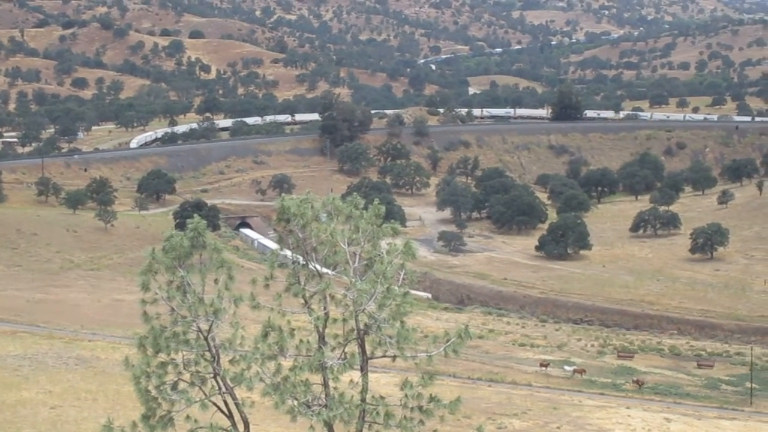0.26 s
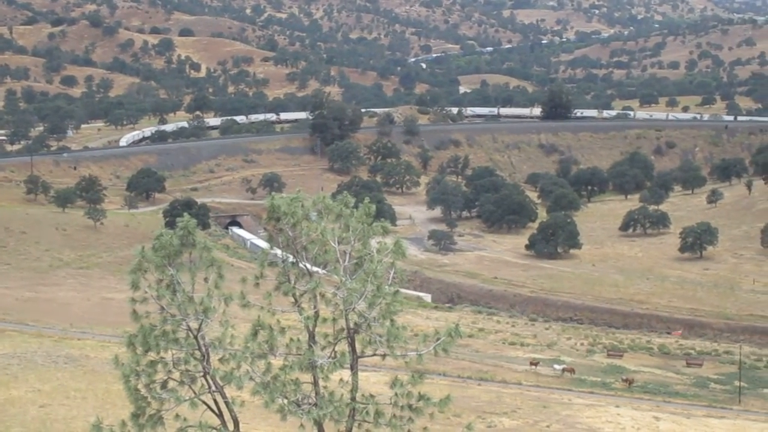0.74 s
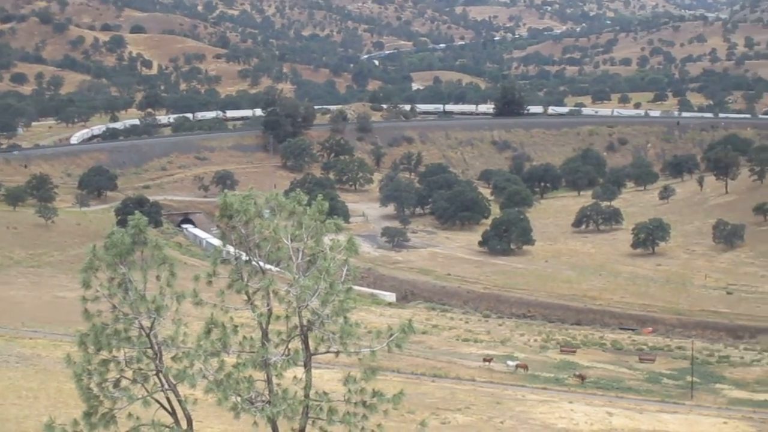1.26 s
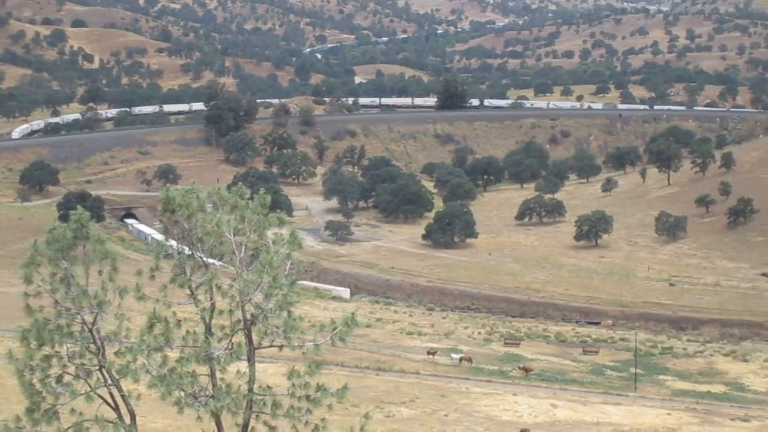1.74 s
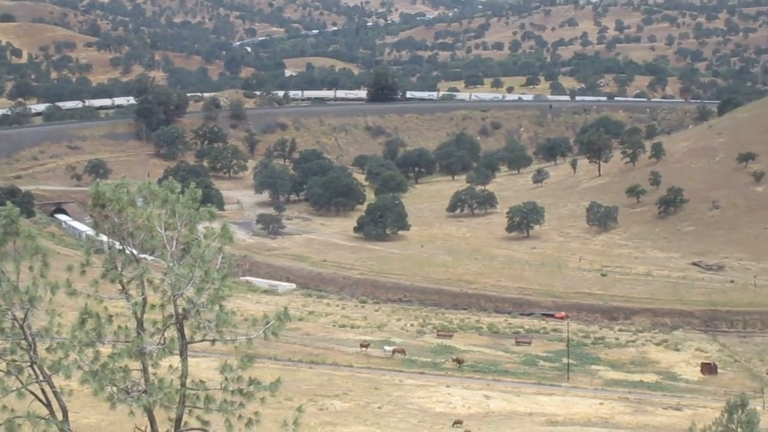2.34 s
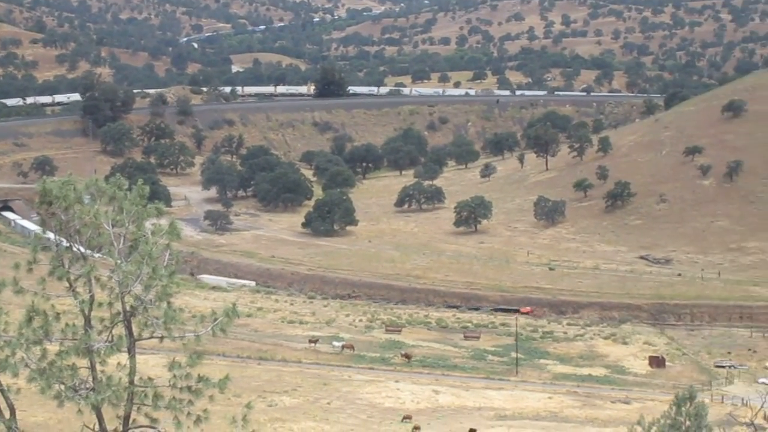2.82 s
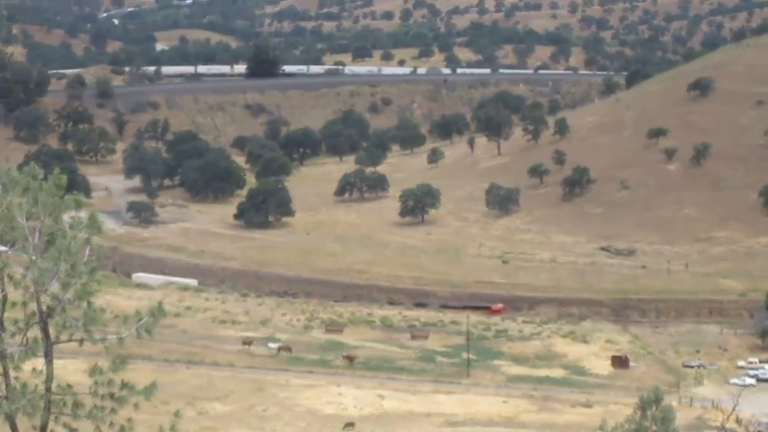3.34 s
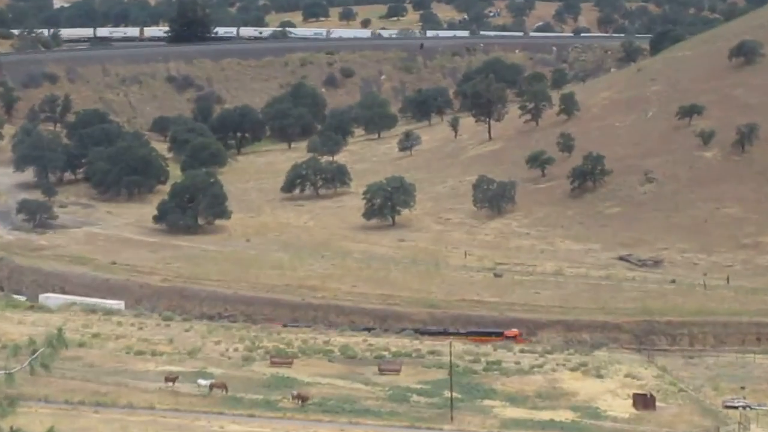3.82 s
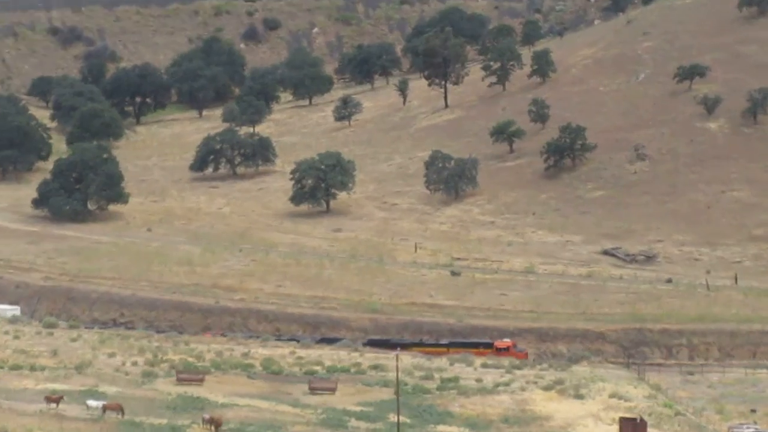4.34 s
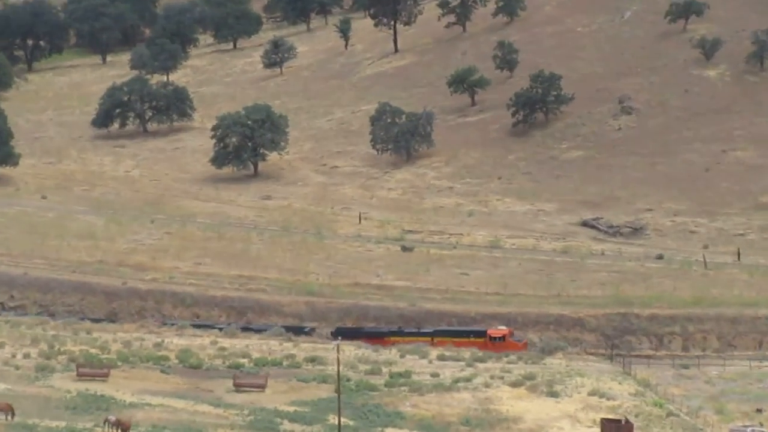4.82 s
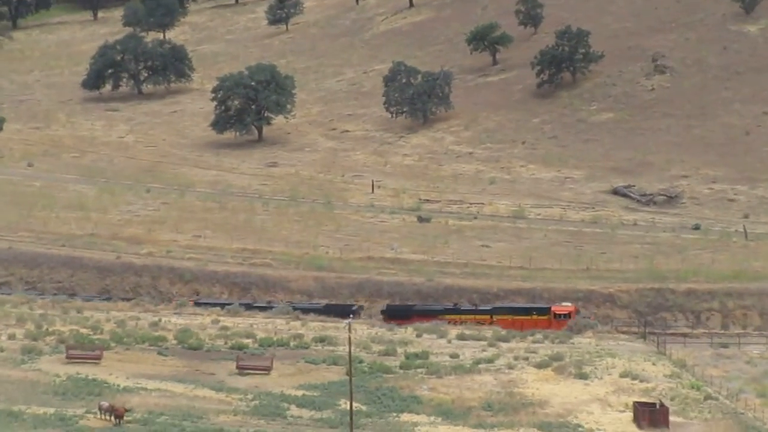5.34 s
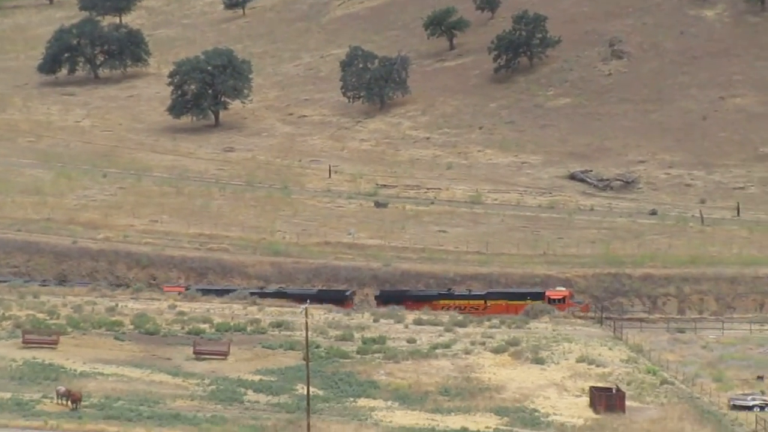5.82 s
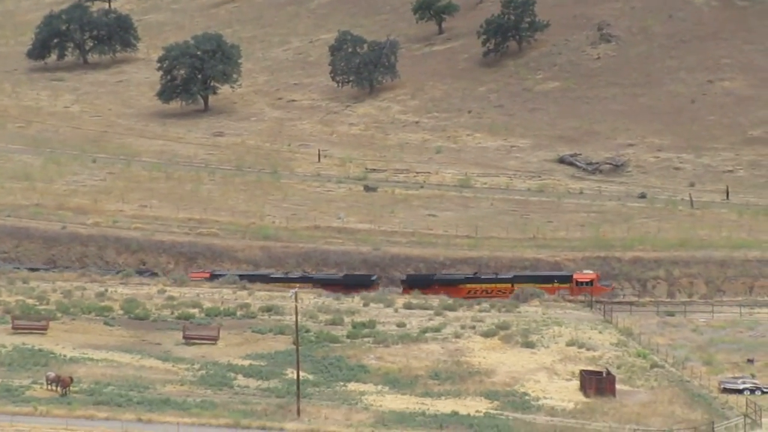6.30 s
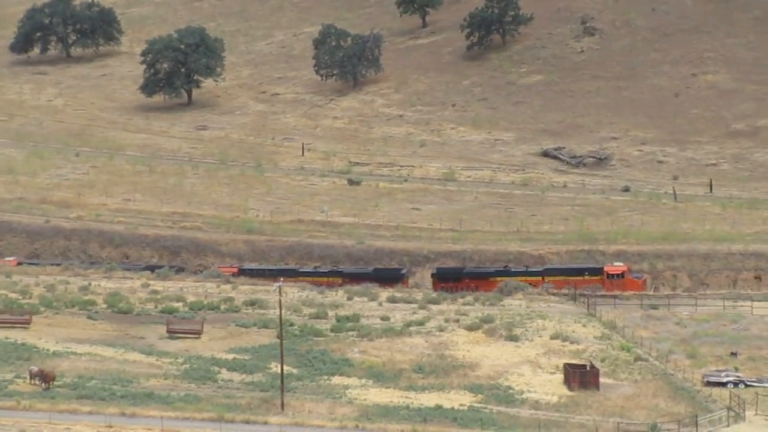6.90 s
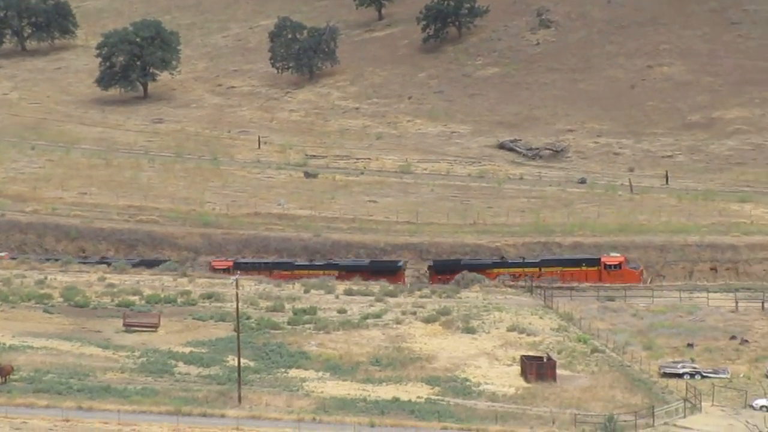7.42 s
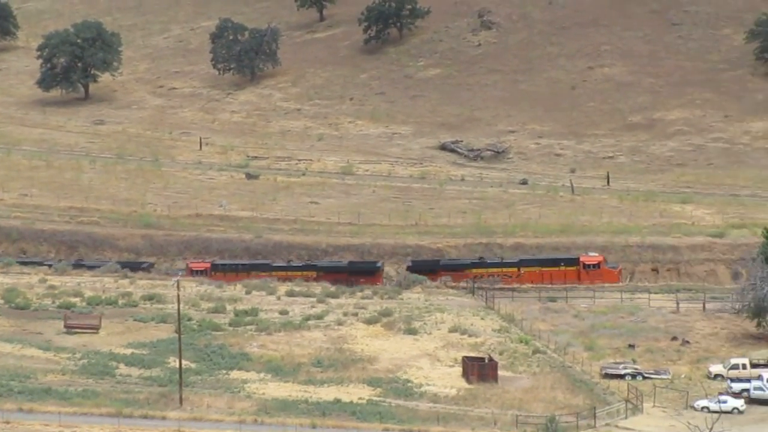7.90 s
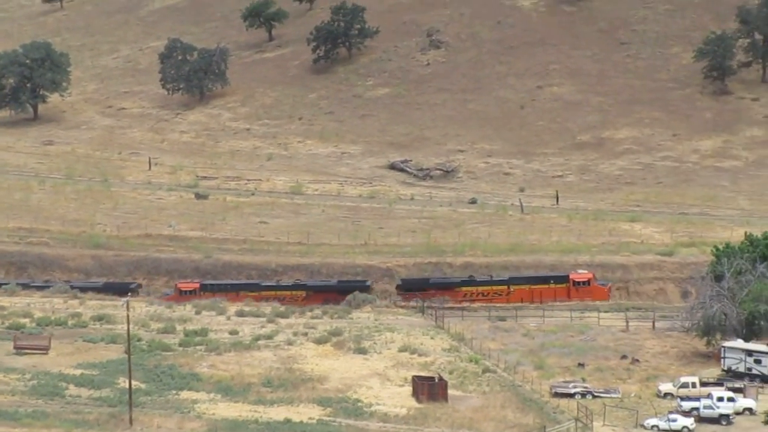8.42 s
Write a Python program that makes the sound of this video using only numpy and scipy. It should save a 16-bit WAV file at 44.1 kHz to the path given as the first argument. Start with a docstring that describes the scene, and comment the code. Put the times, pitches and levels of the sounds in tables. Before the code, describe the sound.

Mono outdoor sound from a breezy hillside above a dry valley. Throughout, distant diesel locomotives give a low, wavering drone with throbbing exhaust, layered fan and blower whines, and thin, broken turbo whistles near 4 kHz; rolling wheels and singing rails add a soft hiss. From 0 to 2 s, wind patters, rasps and thumps densely on the microphone over deep rumble. Around 2.5-3.5 s, a faint scraping rush of flanges swells; at 3 s a few tiny bright ticks sound and a faint zoom motor whirs until about 5.3 s. Deep gusts continue, with a hard, slightly overloaded thump at 5 s, another scrape near 5.4 s, and the sharpest buffet at 5.9 s, followed by brief ducking and slow recovery. From 6 to 7 s it is calmer; scattered thumps come around 7-7.6 s. The whines strengthen and the low wind surges again towards 8.7 s.

```python
"""Diesel-electric locomotives haul a long freight train up a grade, far across a dry valley.
Engine harmonics, blade-tone stacks and turbo whistles waver and fade as the moving air scatters them.
Filtered noise makes the exhaust, rolling wheels, singing rails and the scrape of flanges on the curve.
At the hillside microphone gusts rumble, rasp and thump as eddies cross its port, over a very faint high hiss.
A lens motor whirs, a few bright ticks ring, and the recorder ducks under the hardest peaks."""
import sys
import numpy as np
from scipy import signal
from scipy.fft import rfft, irfft, next_fast_len
from scipy.io import wavfile
from scipy.ndimage import uniform_filter1d

SR = 44100
rng = np.random.default_rng(int(sys.argv[2]) if len(sys.argv) > 2 else 0)


def inscribe(sig):
    """Save sig as 16-bit PCM at rate SR to the path in sys.argv[1].

    A 1-D sig is mono; a 2-D sig holds one channel per row.
    Samples are clipped to [-1, 1] before scaling.
    """
    pcm = np.round(np.clip(np.atleast_2d(sig).T, -1, 1) * 32767)
    wavfile.write(sys.argv[1], SR, pcm.astype(np.int16))


N = 381899

CRANK_HZ = 26.5  # mean spacing of the engine harmonics

# how well the moving air carries the train's roar, relative levels: time_s, exhaust_db, wheels_db
TRAIN_CARRY = [(0.0, -35, -42.5), (0.55, -35, -46.5), (0.8, -40, -47.5), (1.25, -37.5, -46),
               (1.85, -33.5, -41), (2.25, -35, -43), (2.5, -34.5, -37), (3.05, -35.5, -36.5),
               (3.4, -37, -41.5), (4.1, -32, -43.5), (4.4, -32.5, -45), (4.65, -32, -42), (4.9, -39.5, -45),
               (5.35, -31, -40), (5.75, -36, -43), (6.6, -34.5, -45), (7.6, -33, -43), (8.66, -29.5, -40)]
# locomotive whines and hiss, each fading by itself, relative levels:
# time_s, blower_low_partials_db, fan_high_partials_db, turbo_hiss_db
MACHINE_FADES = [(0.0, -38, -54, -56), (0.55, -38, -59, -46.5), (1.25, -40.5, -50, -51.5),
                 (1.85, -37, -46.5, -51), (2.5, -39, -49, -58), (3.45, -34, -51, -49.5),
                 (4.15, -32, -48, -54), (4.7, -39.5, -48.5, -56), (5.15, -34, -62, -70),
                 (5.6, -39, -49.5, -53), (6.2, -54, -49, -56), (7.0, -48, -47, -48),
                 (7.45, -38, -41, -47.5), (8.15, -40, -45.5, -45.5), (8.66, -29.5, -39, -45)]
# strength of the wind between its gusts, relative levels: time_s, microphone_rumble_db, deep_surge_db
WIND_STRENGTH = [(0.0, -28, -37), (0.7, -24.5, -35), (1.4, -23, -37), (1.6, -19.5, -33), (2.0, -24.5, -28),
                 (2.3, -25, -23.5), (2.5, -25, -33), (2.9, -25.5, -28), (3.28, -31.5, -27),
                 (3.45, -26, -34), (3.65, -27.5, -29), (4.0, -27.5, -27.5), (4.5, -27, -35),
                 (4.74, -30, -27), (5.1, -29, -29.5), (5.7, -27, -27), (6.05, -28, -31),
                 (6.7, -35.5, -32.5), (7.25, -30.5, -28), (7.9, -25.5, -34), (8.66, -25.5, -20.5)]
# gusts that thump on the microphone, relative levels: time_s, thump_db, nominal_eddy_hz, gust_rumble_db
GUST_THUMPS = [(0.038, -6, 330, -11.5), (0.059, -7, 361, -12), (0.278, -12, 704, -25),
               (0.291, -8, 377, -25.5), (0.305, -16, 400, -30), (0.312, -10.5, 326, -29),
               (0.396, -11.5, 377, -34.5), (0.406, -4, 420, -29), (0.42, -2.5, 335, -16),
               (0.488, -15, 440, -23), (0.498, -5.5, 353, -25), (0.63, -11.5, 130, -29),
               (0.641, -18, 550, -33.5), (0.651, -1.5, 328, -36), (0.672, -7, 354, -27),
               (0.698, -15, 240, -38), (0.858, -12.5, 280, -27), (0.877, -11.5, 330, -35),
               (0.898, -8, 395, -30), (0.912, -9.5, 307, -33), (0.999, -12.5, 378, -34),
               (1.217, -6.5, 310, -18), (1.422, -15, 380, -32), (1.502, -18, 368, -33),
               (1.509, -7.5, 253, -24), (1.556, -11, 300, -31), (1.595, -7, 130, -13.5),
               (1.708, -5.5, 114, -28), (1.792, -9, 400, -31), (1.823, -6, 170, -26), (1.847, -5, 347, -25),
               (1.853, -2.5, 278, -20.5), (1.917, -3, 246, -28), (1.956, -1, 400, -23),
               (1.967, -9.5, 430, -27), (2.134, -4.5, 400, -27), (2.143, -2, 205, -26.5),
               (2.325, -13, 312, -26), (2.592, -7, 262, -24.5), (2.681, -5.5, 158, -29),
               (2.899, -13.5, 400, -21), (2.96, -3, 140, -23.5), (2.973, -8.5, 480, -33),
               (2.983, -5, 170, -19), (2.994, -5, 210, -16), (3.029, -22, 290, -15),
               (3.062, -9.5, 556, -23), (3.079, -2, 213, -23), (3.166, -9.5, 450, -38),
               (3.178, -6, 174, -33), (3.401, -4.5, 232, -22.5), (3.427, -5.5, 323, -31),
               (3.495, -7.5, 89, -23), (3.844, -15.5, 250, -28), (3.96, -4.5, 89, -21),
               (3.996, -6, 160, -24), (4.188, -9.5, 150, -35), (4.22, -10.5, 220, -21),
               (4.335, -0.5, 255, -16.5), (4.58, -13, 312, -16), (4.746, 0.5, 166, -30),
               (4.954, -5, 216, -27), (4.971, -5, 262, -24), (4.98, -4, 560, -25), (4.984, 4, 222, -20.5),
               (4.984, -4.5, 860, -34.5), (4.994, -3.5, 349, -26.5), (5.043, -13, 200, -39.5),
               (5.097, -12, 420, -38), (5.15, -12, 560, -41.5), (5.192, -8.5, 154, -22),
               (5.216, -10, 360, -35), (5.237, -11.5, 400, -29), (5.249, -6.5, 340, -27),
               (5.343, -11.5, 300, -27), (5.439, 0.5, 199, -17.5), (5.472, -11, 260, -28),
               (5.541, -3.5, 278, -32), (5.55, -5.5, 253, -23), (5.562, -1, 234, -35),
               (5.612, -14, 520, -36), (5.632, -11, 250, -29.5), (5.755, -13, 330, -38),
               (5.771, -8, 199, -30), (5.825, -8, 200, -26), (5.844, -2, 200, -42), (5.877, 3.5, 460, -22),
               (5.88, 8, 640, -24), (5.881, -8, 1350, -38), (5.892, 2.5, 545, -27),
               (6.199, -18, 377, -20.5), (7.072, -2.5, 445, -24), (7.242, -8, 283, -25),
               (7.317, -1.5, 226, -32), (7.37, -9, 380, -34), (7.389, -4, 550, -18.5),
               (7.637, -8, 99, -20.5), (8.411, -7, 120, -18), (8.626, -19, 118, -29)]


def undb(db):
    """Decibels to gain."""
    return 10 ** (np.asarray(db) / 20)


def unit(x):
    """Scale to rms 1."""
    return x / np.sqrt(np.mean(x ** 2))


def curves(table):
    """The columns of a table after its times, joined by straight lines, at every sample."""
    s, *columns = np.transpose(table)
    return [np.interp(np.arange(N) / SR, s, column) for column in columns]


def walk(rate):
    """Random levels held 1 / rate s and slewed twice; spread near 1."""
    hold = max(int(SR / rate), 2)
    steps = rng.standard_normal(2048).take(np.arange(N) // hold, mode="wrap")
    slewed = uniform_filter1d(steps, hold)
    return 1.32 * uniform_filter1d(slewed, hold)


def turning(db_per_s):
    """A steady change of level in dB, zero at mid-scene."""
    return db_per_s * (np.arange(N) - N / 2) / SR


def noise(spectrum):
    """Noise of rms 1 with a spectrum of (Hz, dB) points, falling 20 dB per octave beyond its ends."""
    size = next_fast_len(N)
    hz, db = np.transpose(spectrum)
    octave = np.log2(np.maximum(np.arange(size // 2 + 1) * SR / size, 1))
    beyond = np.abs(octave - np.clip(octave, np.log2(hz[0]), np.log2(hz[-1])))
    gain = undb(np.interp(octave, np.log2(hz), db) - 20 * beyond)
    return unit(irfft(rfft(rng.standard_normal(size)) * gain, size)[:N])


def add(out, s, sound):
    """Mix a short sound in, centred on time s."""
    start = int(s * SR) - len(sound) // 2
    lo, hi = max(start, 0), min(start + len(sound), N)
    if hi > lo:
        out[lo:hi] += sound[lo - start:hi - start]


def swell(s, attack, release, shape):
    """A gain that grows to 1 at time s and dies away again, on a 1 ms grid; shape 1 is pointed, 2 is round."""
    t = np.arange(0, N, SR // 1000) / SR - s
    return np.exp(-np.maximum(-t / attack, t / release) ** shape)


def swells(events, attack, release, shape):
    """Joint gain of swells given as (s, dB), their powers added, at every sample."""
    power = sum((undb(db) * swell(s, attack, release, shape)) ** 2 for s, db in events)
    return np.interp(np.arange(N), np.arange(0, N, SR // 1000), np.sqrt(power))


def rotation(hz, wander):
    """Phase of a governed shaft whose speed wanders slightly about its setting."""
    drift = walk(2)
    return 2 * np.pi * np.cumsum(hz * (1 + wander * (drift - drift.mean()))) / SR


def far_tone(phase, scatter, rate):
    """A tone of rms near 1 over a long path: the direct wave plus waves scattered by moving air."""
    phase = phase + 2 * np.pi * rng.random()
    in_step = (1 + scatter * walk(rate)) * np.sin(phase)
    out_of_step = scatter * walk(rate) * np.cos(phase)
    return (in_step + out_of_step) / np.sqrt(.5 + scatter ** 2)


def engines(fade_db=3.5):
    """The diesels under full load: harmonics locked to one wandering shaft, each scattered on its way over."""
    # the two loudest harmonics, fading apart on the way over the ground: time_s, harmonic_3_db, harmonic_5_db
    drone = [(0.0, -19.5, -29), (0.4, -23.5, -29.5), (0.85, -25.5, -33.5), (1.498, -22, -24),
             (2.3, -26.5, -36), (2.9, -33, -25), (3.4, -26.5, -29.5), (4.15, -37, -21), (4.9, -30, -36),
             (5.7, -23, -33.5), (6.7, -30, -25), (7.2, -35, -26), (8.0, -34, -41), (8.66, -27.5, -20.5)]
    # even harmonics that follow the exhaust: multiple, level_db relative to the exhaust curve
    even_harmonics = [(2, 4.5), (4, 2.5)]
    # weaker harmonics at steady mean level: multiple, level_db
    overtones = [(6, -39), (7, -37), (8, -49.5), (9, -64), (10, -44), (14, -61.5)]
    phase = rotation(CRANK_HZ, wander=0.0029)
    exhaust, _ = curves(TRAIN_CARRY)
    levels = list(zip((3, 5), curves(drone)))
    levels += [(round(k), exhaust + db + fade_db * walk(2.8)) for k, db in even_harmonics]
    strong = sum(undb(db) * far_tone(k * phase, scatter=0.14, rate=7.5) for k, db in levels)
    weak = sum(undb(db) * far_tone(round(k) * phase, scatter=0.53, rate=4) for k, db in overtones)
    return strong + weak


def exhaust_and_turbo_hiss(exhaust_db=5.5, turbo_db=-3, throb=0.13, flutter_db=1.3, turbo_flutter_db=4.1):
    """Exhaust gas and the turbochargers' narrow hiss: shaped noise, pulsing together at the engine rate."""
    # spectrum of the exhaust: frequency_hz, density_db
    gas_spectrum = [(30, -4.5), (60, 8.5), (130, 0.5), (250, 5.5), (450, -4.5), (580, -4.5), (700, -1.5),
                    (900, 0), (1150, -12), (1300, -10.5), (1480, -10.5), (1800, -20.5), (3000, -24.5)]
    # spectrum of the turbocharger hiss: frequency_hz, density_db
    hiss_spectrum = [(3300, -20), (3650, -4), (3860, 5), (3970, -2.5), (4090, 1), (4250, -14.5),
                     (5000, -41.5)]
    exhaust, _ = curves(TRAIN_CARRY)
    *_, turbo = curves(MACHINE_FADES)
    beat = 1 + throb * np.sin(rotation(CRANK_HZ, wander=0.0017))
    gas = noise(gas_spectrum) * undb(exhaust + exhaust_db + flutter_db * walk(4.5))
    intake = noise(hiss_spectrum) * undb(turbo + turbo_db + turbo_flutter_db * walk(7.5))
    return beat * (gas + intake)


def blade_tones(hz, partials, low_db, high_db, scatter):
    """Multiples of one blade rate, shimmering with distance; those below and above 1 kHz fade apart."""
    phase = rotation(hz, wander=0.001)
    out = np.zeros(N)
    for k, db in partials:
        path_db = low_db if k * np.mean(hz) < 1000 else high_db
        out += undb(path_db + db) * far_tone(round(k) * phase, scatter, rate=14)
    return out


def fans(scatter=0.38, low_db=-6, turn_db_s=0.38, rear_hz=210.3):
    """Cooling fans of two units: stacks of blade tones at nearly one rate, beating against each other."""
    # blade rate of the leading unit's fans: time_s, rate_hz
    lead_speed = [(0, 210.5), (5, 210.2), (7, 209.3)]
    # partials of the leading unit's fans, relative levels: multiple, level_db
    lead_partials = [(2, -7), (4, -5), (6, -1), (8, -3), (10, -9), (12, -13)]
    # partials of the rear unit's fans, relative levels: multiple, level_db
    rear_partials = [(3, -4.5), (4, -4.5), (5, -6.5), (6, -9.5), (7, -4.5), (8, -17.5), (9, -15.5),
                     (10, -15.5)]
    exhaust, _ = curves(TRAIN_CARRY)
    _, high, _ = curves(MACHINE_FADES)
    lead_hz, = curves(lead_speed)
    # the fans turn towards the microphone as the locomotives draw abreast
    low = exhaust + low_db + turning(turn_db_s)
    lead = blade_tones(lead_hz, lead_partials, low, high, scatter)
    return lead + blade_tones(rear_hz, rear_partials, low, high, scatter)


def blowers(scatter=0.48, high_db=-5, high_turn_db_s=-1.5):
    """Blowers whine as a stack of blade tones on a higher rate than the fans."""
    # blade rate: time_s, rate_hz
    speed = [(0, 375.3), (5, 375.2), (7.5, 373.6)]
    # partials, relative levels: multiple, level_db
    partials = [(2, -4.5), (3, -6.5), (4, -5.5), (5, -17), (6, -13.5), (8, -19)]
    _, wheels = curves(TRAIN_CARRY)
    low, _, _ = curves(MACHINE_FADES)
    hz, = curves(speed)
    # the high partials turn away from the microphone as the locomotives draw abreast
    high = wheels + high_db + turning(high_turn_db_s)
    return blade_tones(hz, partials, low, high, scatter)


def turbos(level_db=-2.0, scatter=1.4, fade_db=2):
    """Each turbocharger whistles thinly, wavering in pitch and broken up by the air."""
    # mean whistle pitches of the leading and the rear unit: pitch_hz
    pitches = [3858, 3770]
    # the whistles come and go, relative levels: time_s, leading_unit_db, rear_unit_db
    whistle_levels = [(0, -58.5, -56), (0.45, -65, -67), (0.65, -61, -61), (0.9, -58, -58), (1.4, -64, -67),
                      (1.85, -58, -57.5), (2.3, -59.5, -61), (2.9, -57.5, -61), (3.5, -60, -62),
                      (4.3, -58, -66), (4.75, -60, -62), (5.0, -68, -72), (5.8, -64, -69), (6.3, -59, -67),
                      (7.0, -56.5, -61), (7.85, -53, -61), (8.66, -58, -56)]
    out = np.zeros(N)
    for hz, db in zip(pitches, curves(whistle_levels)):
        gain = undb(db + level_db + fade_db * walk(7))
        out += gain * far_tone(rotation(hz, wander=0.003), scatter, rate=70)
    return out


def wheels_and_rails(wheels_db=2, flutter_db=1.3):
    """Wheels rolling on singing rails: two bands of noise that flutter and fade separately."""
    # spectrum of the rolling wheels: frequency_hz, density_db
    wheel_spectrum = [(700, -11), (1150, 0.5), (1450, 7), (1800, 0), (2200, 2), (2750, -4.5), (3150, -5),
                      (3600, -7), (4200, -13), (5000, -38.5)]
    # spectrum of the singing rails: frequency_hz, density_db
    rail_spectrum = [(3000, -18), (4000, -6), (4500, 7), (4950, 3), (5350, 0), (5750, -9.5), (6600, -24.5),
                     (8000, -34.5)]
    # how loudly the rails sing, before flutter: time_s, level_db
    rail_level = [(0, -57.5), (0.55, -57), (1.2, -59), (1.85, -57), (2.25, -62), (2.6, -58), (3.05, -55),
                  (3.55, -52), (3.85, -59), (4.6, -60), (4.95, -62.5), (5.4, -58.5), (6.0, -60.5),
                  (6.8, -62), (7.8, -57.5), (8.66, -59.5)]
    _, wheels = curves(TRAIN_CARRY)
    rails, = curves(rail_level)
    rolling = noise(wheel_spectrum) * undb(wheels + wheels_db + flutter_db * walk(17))
    return rolling + noise(rail_spectrum) * undb(rails + flutter_db * walk(14.0))


def narrow_hiss_and_scrape(hiss_db=-13.5, flutter_db=4.0, scrape_db=0.5, judder_db=1.8):
    """A narrow hiss about the blowers' eighth partial, swelling with the broad scrape of biting flanges."""
    # spectrum of the narrow hiss near 3 kHz: frequency_hz, density_db
    hiss_spectrum = [(2650, -12), (2870, -2.5), (2990, 7.5), (3110, -3.5), (3450, -16.5)]
    # spectrum of the scraping rush: frequency_hz, density_db
    scrape_spectrum = [(1250, -9), (1500, -1.5), (1900, 0), (2300, 6), (2750, -3), (3250, -1), (3900, -9),
                       (4700, -7.5), (5500, -34.5)]
    # flanges bite on the curve, relative levels: peak_s, narrow_hiss_db, scraping_db
    bite_events = [(0.5, -50, -51), (1.75, -56.5, -49.5), (2.48, -46, -43.5), (2.68, -47, -41),
                   (2.92, -47, -45), (3.2, -50, -52.5), (3.5, -47, -50.5), (5.3, -47, -43),
                   (5.44, -48.5, -41)]
    _, wheels = curves(TRAIN_CARRY)
    s, hisses, scrapes = np.transpose(bite_events)
    hiss_swells = swells(zip(s, hisses), attack=0.12, release=0.2, shape=1.0)
    rush = swells(zip(s, scrapes), attack=0.12, release=0.2, shape=1.0)
    strength = np.hypot(undb(wheels + hiss_db), hiss_swells)
    hiss = noise(hiss_spectrum) * strength * undb(flutter_db * walk(3.5))
    return hiss + noise(scrape_spectrum) * rush * undb(scrape_db + judder_db * walk(90))


def eddy(hz, turn):
    """One swing of pressure as an eddy crosses the port; small ones are quicker, turn sets push or pull first."""
    t = np.arange(-int(2 * SR / hz), int(2 * SR / hz)) / SR
    pulse = np.exp(2j * np.pi * turn) / (1 - 2j * np.pi * hz * t / 3.5) ** 4
    return pulse.real * np.hanning(len(t))


def eddy_stream(hz, octaves, spread_db, count):
    """Eddies at random moments, scattered in size and quickness; rms 1."""
    out = np.zeros(N)
    moments = rng.random((count, 2))
    scatters = np.clip(rng.standard_normal((count, 2)), -2, 2)
    for (when, turn), (size, quick) in zip(moments, scatters):
        add(out, when * N / SR, undb(spread_db * size) * eddy(hz * 2 ** (octaves * quick), turn))
    return unit(out)


def buffets(parent_db=-5.0, parent_ratio=0.38, shed_db=-14, shed_ratio=1.92, lag_s=0.004104, count=3):
    """The strongest eddies thump singly; each rides on a larger, slower one and sheds a few quick ones."""
    out = np.zeros(N)
    draws = rng.random((len(GUST_THUMPS), 2 + 3 * count))
    for (s, db, hz, _), (turn, parent_turn, *shed) in zip(GUST_THUMPS, draws):
        add(out, s, undb(db) * eddy(hz, turn))
        add(out, s, undb(db + parent_db) * eddy(hz * parent_ratio, parent_turn))
        for when, quick, twist in np.reshape(shed, (count, 3)):
            ratio = shed_ratio * 2 ** (quick - .5)
            gain = undb(db + shed_db) * shed_ratio / ratio  # quicker ones are weaker
            add(out, s + lag_s * (2 * when - 1), gain * eddy(hz * ratio, twist))
    # the port is too wide to feel the very smallest eddies
    return signal.sosfilt(signal.butter(3, 1900, fs=SR, output="sos"), out)


def wind(rumble_db=-3, eddies_db=-8, breeze_db=4, gust_db=4.5, rasp_db=-8, rasp_grain_db=3,
         gust_rumble_db=2.0, steady_db=-2, lull_db=2, tilt_db_octave=1, pivot_hz=295, build_s=0.029, die_s=0.026):
    """Turbulent rumble and small eddies on the microphone, raspier in gusts, over a deep surging breeze."""
    # spectrum of the lasting breeze: frequency_hz, density_db
    breeze_spectrum = [(10, -18.5), (25, 5.5), (45, -4.5), (80, 0.5), (130, -1), (200, -11.5), (300, -30),
                       (600, -50)]
    # spectrum of the rumble: frequency_hz, density_db
    rumble_spectrum = [(20, -27.5), (50, -16), (90, 1.5), (180, 4.5), (280, -5), (500, -13.5), (1000, -33),
                       (2500, -51.5)]
    # spectrum of the rasp that only the gusts add: frequency_hz, density_db
    rasp_spectrum = [(120, -14.5), (290, 7), (550, -20.5), (900, -16.5), (1400, -34), (2500, -43.5)]
    steady, surge = curves(WIND_STRENGTH)
    s, _, hz, db = np.transpose(GUST_THUMPS)
    # gusts with quick eddies rasp more, those with slow ones rumble more
    tilt = tilt_db_octave * np.log2(hz / pivot_hz)
    # a gust swells up to its thump and drops away
    gusts = swells(zip(s, db - tilt / 2), build_s, die_s, shape=0.81)
    rasps = swells(zip(s, db + tilt), build_s, die_s, shape=0.68)
    between = undb(steady + steady_db + lull_db * walk(5.9))
    flow = np.hypot(between, undb(gust_rumble_db) * gusts)
    eddies = eddy_stream(hz=152, octaves=0.55, spread_db=6, count=500)
    rumble = noise(rumble_spectrum) * undb(rumble_db + gust_db * walk(30))
    breeze = noise(breeze_spectrum) * undb(surge + breeze_db + 4.45 * walk(12))
    rasp = unit(noise(rasp_spectrum) * undb(rasp_grain_db * walk(220)))  # grains of a few milliseconds
    return flow * (rumble + undb(eddies_db) * eddies) + rasps * undb(rasp_db) * rasp + breeze


def crackle(level_db=-2):
    """Small quick eddies patter on the microphone in a random stream that rises and falls."""
    # strength of the patter, relative level: time_s, level_db
    patter_level = [(0, -29.5), (0.55, -24.5), (0.8, -31.5), (0.95, -42), (1.3, -32), (1.6, -33),
                    (1.9, -43), (2.3, -43.5), (2.7, -33), (3.05, -40), (3.6, -46), (4.3, -38), (4.85, -43),
                    (5.25, -32), (5.8, -36), (6.05, -43.5), (6.7, -50), (7.3, -43), (7.8, -35),
                    (8.66, -33.5)]
    strength, = curves(patter_level)
    return undb(strength + level_db) * eddy_stream(hz=352, octaves=0.58, spread_db=3.5, count=650)


def lens_motor(grain_db=2.5):
    """A lens motor zooms: a faint whir of grainy noise that comes in, swells and fades out."""
    # spectrum of the whir: frequency_hz, density_db
    spectrum = [(4000, -11), (6500, -2), (7300, 0.5), (7900, -8.5), (8400, -1), (9100, -5), (10600, -1),
                (12600, -7.5), (13400, -12.5), (15000, -7)]
    # level before the grain: time_s, level_db
    motor_level = [(2.98, -93), (3.025, -63), (3.09, -71), (3.2, -71), (3.55, -70), (4.18, -65.5),
                   (4.45, -68.5), (4.74, -66), (4.8, -74), (5.05, -69), (5.3, -100)]
    motor, = curves(motor_level)
    return noise(spectrum) * undb(grain_db * walk(300)) * undb(motor)


def ticks(level_db=-7, rise_ms=0.6, snap_db=-2, snap_ms=1.5):
    """Tiny bright ticks: a snap of noise, and modes that swell within a millisecond and ring."""
    # most come as the zoom starts; the last is the crack of an overloading thump.
    # relative levels: time_s, level_db
    events = [(3.028, -43), (3.039, -33), (3.064, -43), (3.084, -38), (3.132, -47), (3.181, -35.5),
              (4.984, -36)]
    # what they ring with, relative levels and nominal pitches: pitch_hz, level_db, t60_ms
    modes = [(5700, 1, 15), (6600, 1, 11), (7200, -2, 7.4), (9300, -4, 7.3), (10600, -12, 8),
             (12000, -3, 10), (14300, -3, 6)]
    out = np.zeros(N)
    ms = np.maximum(np.arange(-SR // 50, SR // 50) * 1000 / SR, 0)
    body = signal.butter(2, 6000, fs=SR, output="sos")
    rise = 1 - np.exp(-(ms / rise_ms) ** 2)
    for s, db in events:
        start_s = s - rise_ms / 1000
        burst = rng.standard_normal(len(ms)) * (ms > 0) * np.exp(-ms / snap_ms)
        add(out, start_s, undb(db + snap_db) * signal.sosfilt(body, burst))
        for hz, mode_db, t60 in modes:
            pitch = hz * (1 + 0.048 * rng.standard_normal())
            ring = np.sin(2 * np.pi * pitch * ms / 1000) * undb(-60 * ms / t60)
            add(out, start_s, undb(db + mode_db + level_db) * ring * rise)
    return out


def thin_hiss(level_db=-75, follow=.4):
    """A very faint high hiss: shaped noise that gains follow dB per dB of wind between gusts."""
    # spectrum of the hiss: frequency_hz, density_db
    spectrum = [(2000, -7), (6000, -2), (7200, -4), (9000, 6), (11000, 3), (13000, 1), (15500, -8.5)]
    steady, _ = curves(WIND_STRENGTH)
    return noise(spectrum) * undb(level_db + follow * (steady - steady.mean()))


def scene():
    """The distant train behind the wind, in one channel."""
    train = engines() + exhaust_and_turbo_hiss() + fans() + blowers() + turbos()
    train = train + wheels_and_rails() + narrow_hiss_and_scrape()
    at_microphone = buffets() + wind() + crackle() + lens_motor() + ticks() + thin_hiss()
    return (train + at_microphone)[None]


def gain_control(x, ceiling_db=-4, deepest_cut_db=5.5, recover_db_s=3, sense_hz=347, lag_s=0.0005):
    """The gain drops quickly by as much as a peak passes the ceiling, up to a limit, then creeps back."""
    # deaf to the bass
    sensed = signal.sosfiltfilt(signal.butter(2, sense_hz, "high", fs=SR, output="sos"), x)
    peak = np.abs(signal.hilbert(sensed, next_fast_len(N)))[..., :N]
    over_db = np.clip(20 * np.log10(peak + 1e-9) - ceiling_db, 0, deepest_cut_db)
    regained_db = recover_db_s * np.arange(N) / SR
    cut_db = np.maximum.accumulate(over_db + regained_db, axis=-1) - regained_db
    # it acts a moment late, so the front of a hard thump overloads
    keep = np.exp(-1 / (lag_s * SR))
    return x * undb(-signal.lfilter([1 - keep], [1, -keep], cut_db))


def record(dry):
    """The recorder ducks under the hardest thumps and rounds them off; the top is cut at 15.7 kHz."""
    held = gain_control(dry)
    rounded = held / (1 + (held / 1.05) ** 4) ** (1 / 4)
    return signal.sosfilt(signal.ellip(8, .2, 70, 15700, fs=SR, output="sos"), rounded)


dry = scene()
out = record(dry)
inscribe(out)
```